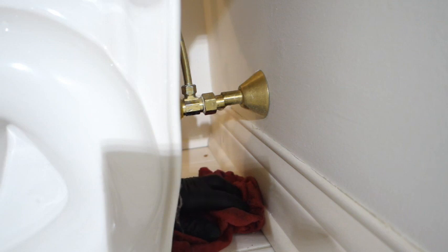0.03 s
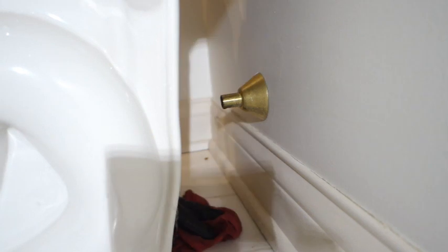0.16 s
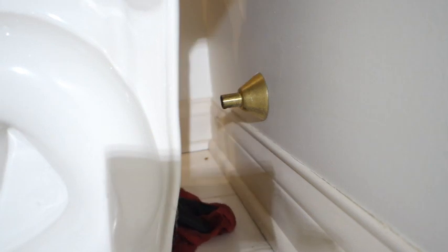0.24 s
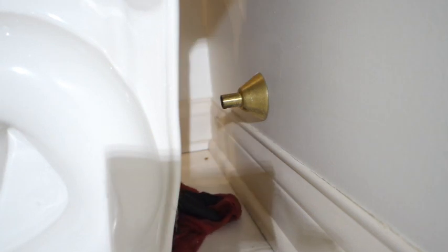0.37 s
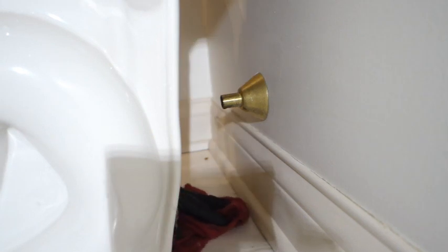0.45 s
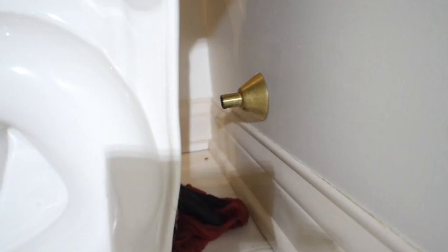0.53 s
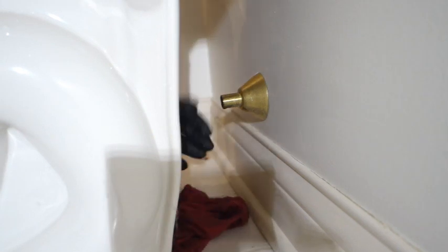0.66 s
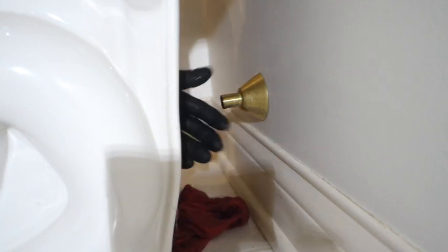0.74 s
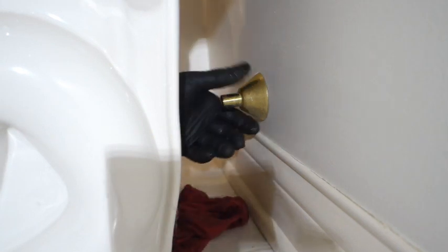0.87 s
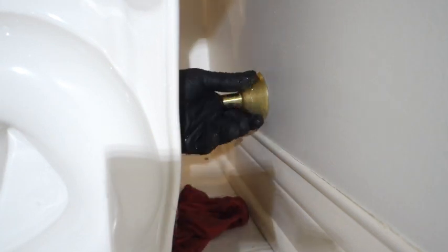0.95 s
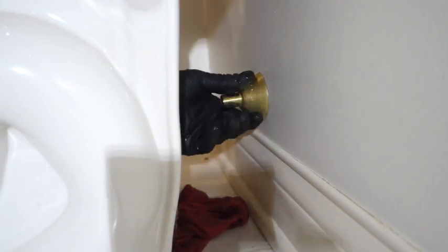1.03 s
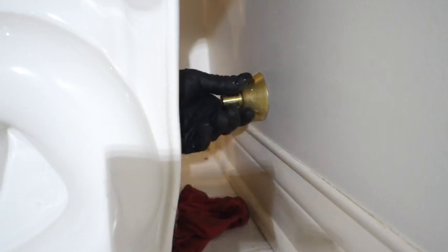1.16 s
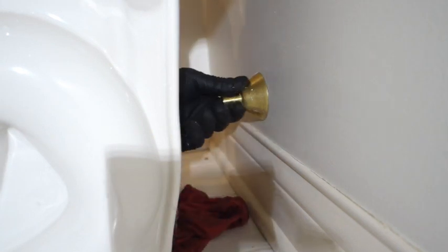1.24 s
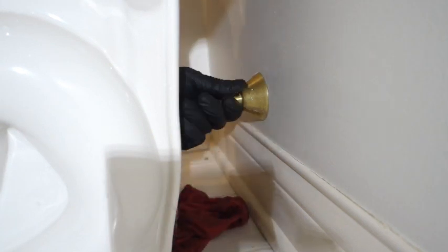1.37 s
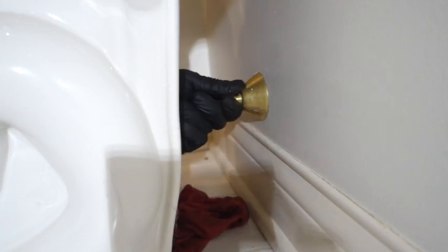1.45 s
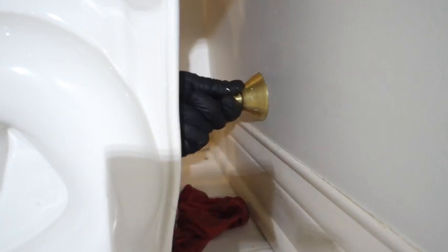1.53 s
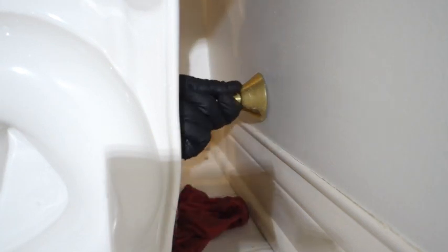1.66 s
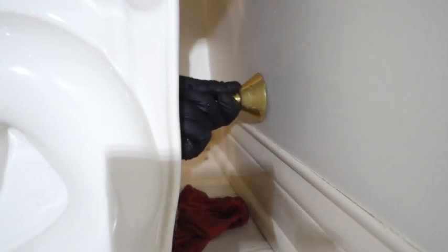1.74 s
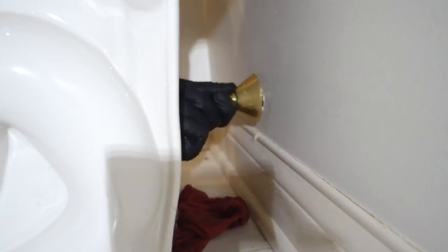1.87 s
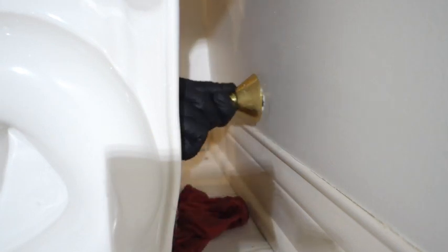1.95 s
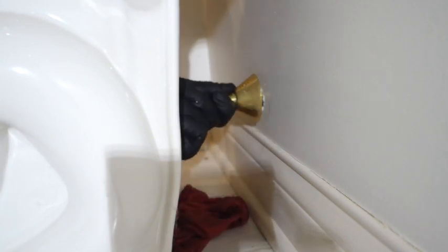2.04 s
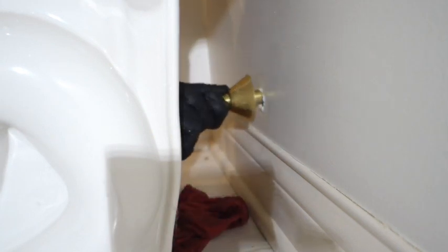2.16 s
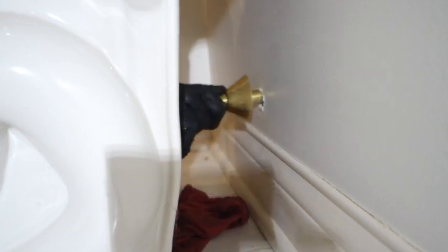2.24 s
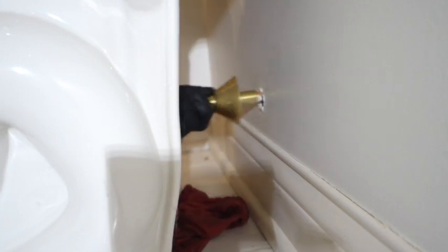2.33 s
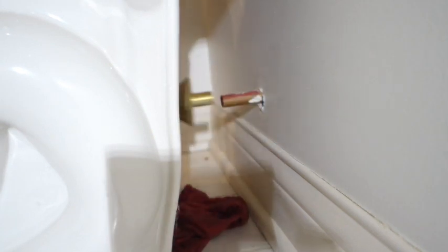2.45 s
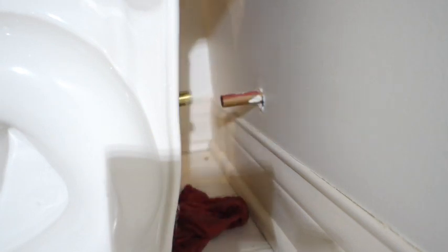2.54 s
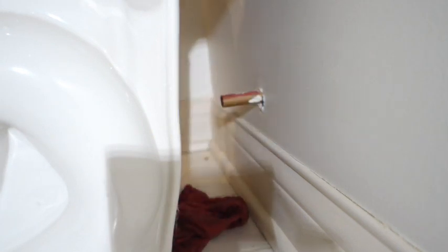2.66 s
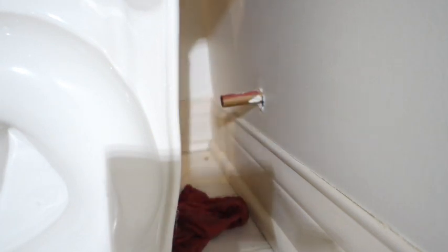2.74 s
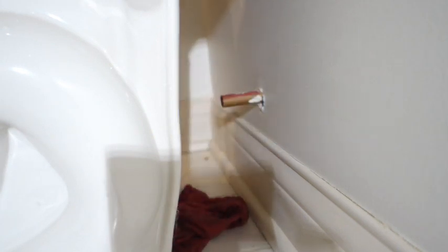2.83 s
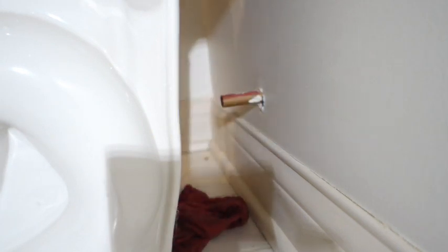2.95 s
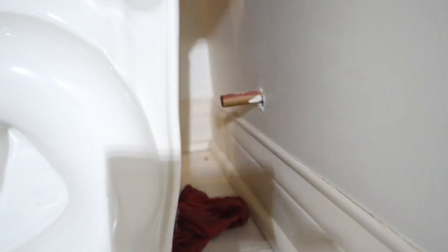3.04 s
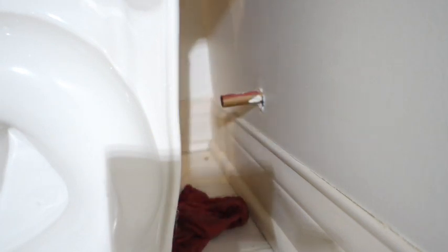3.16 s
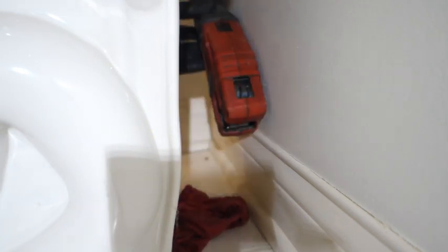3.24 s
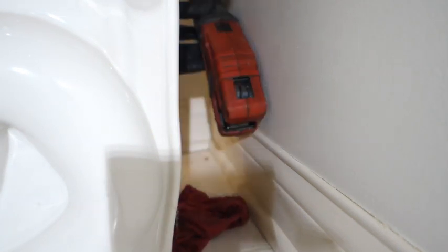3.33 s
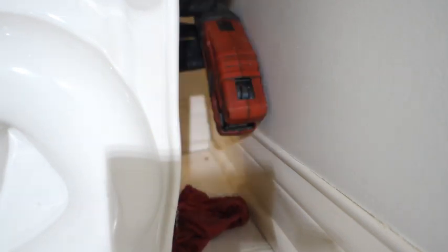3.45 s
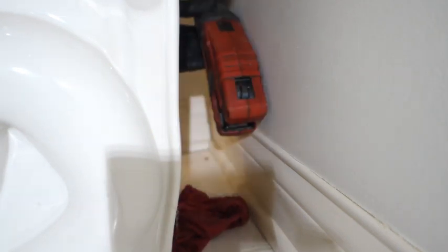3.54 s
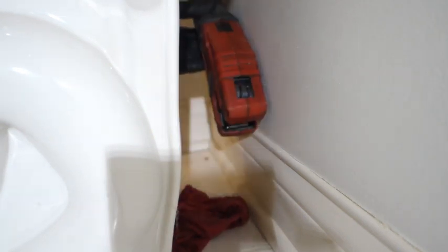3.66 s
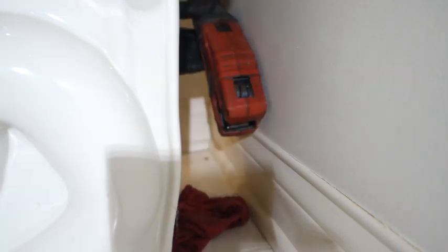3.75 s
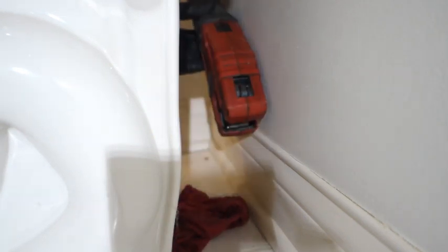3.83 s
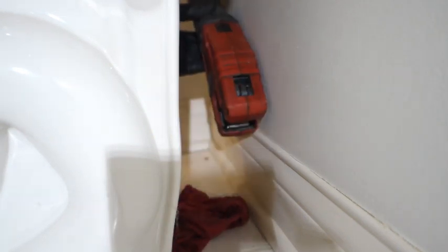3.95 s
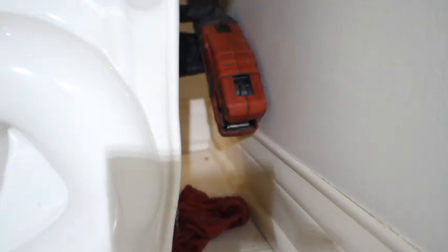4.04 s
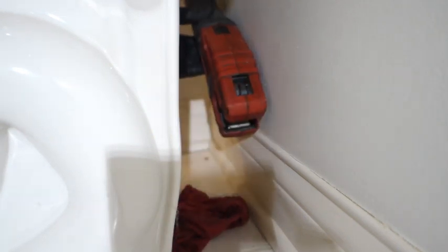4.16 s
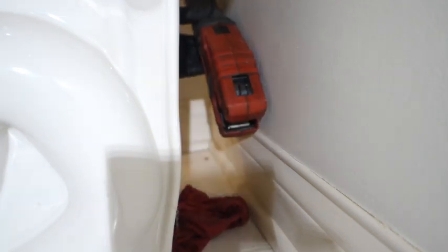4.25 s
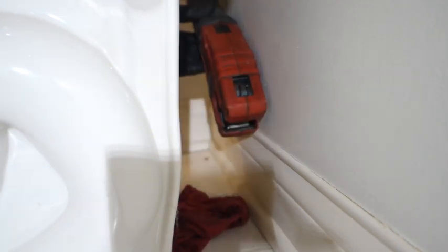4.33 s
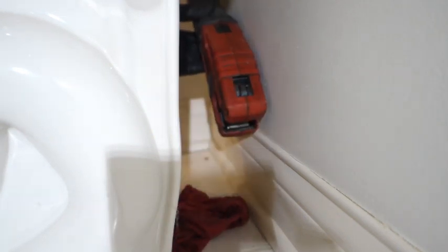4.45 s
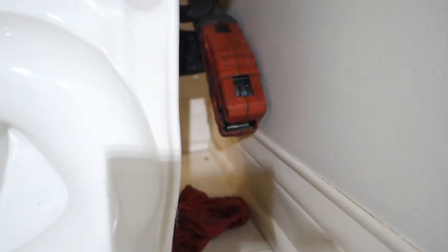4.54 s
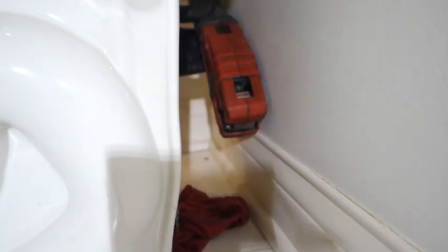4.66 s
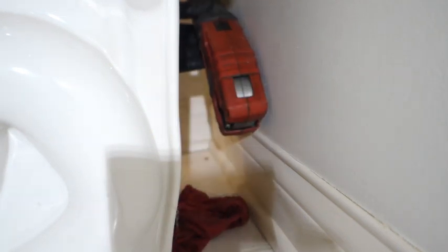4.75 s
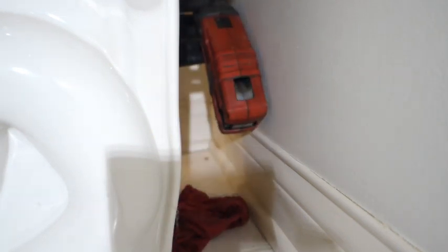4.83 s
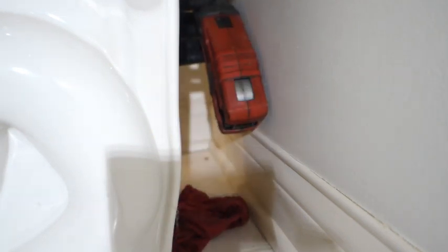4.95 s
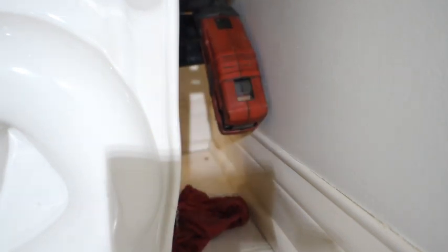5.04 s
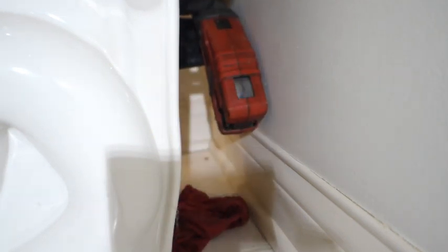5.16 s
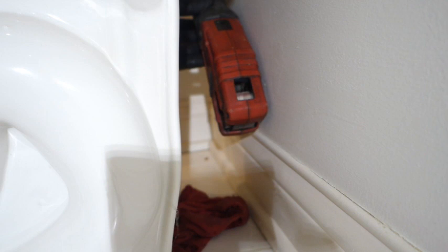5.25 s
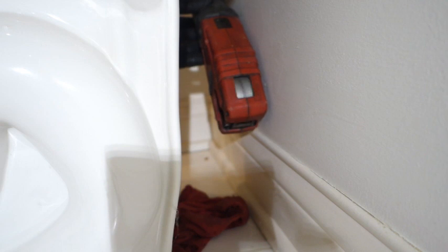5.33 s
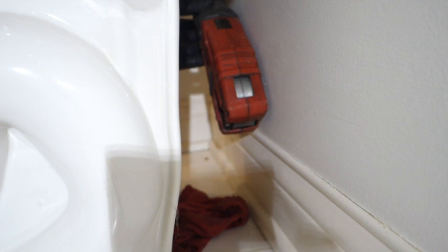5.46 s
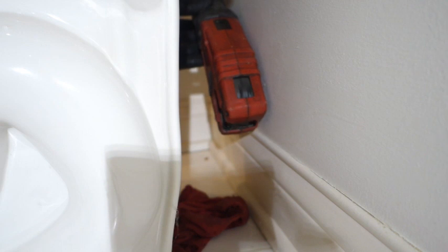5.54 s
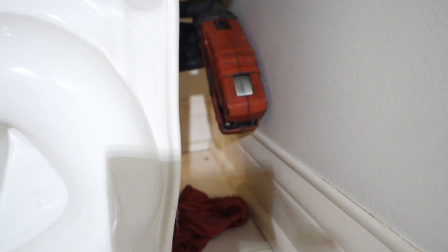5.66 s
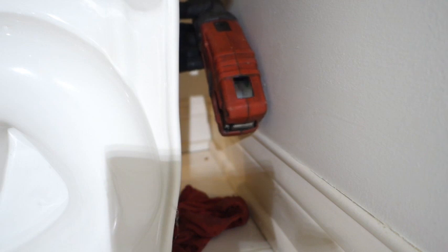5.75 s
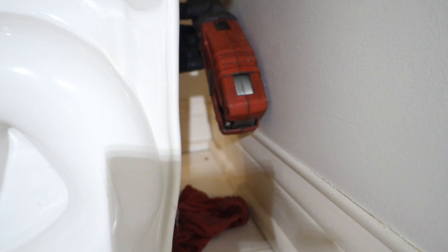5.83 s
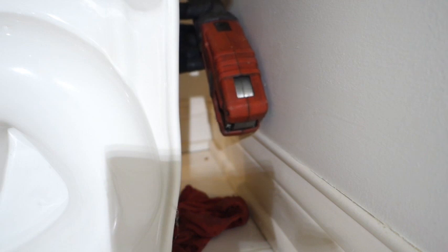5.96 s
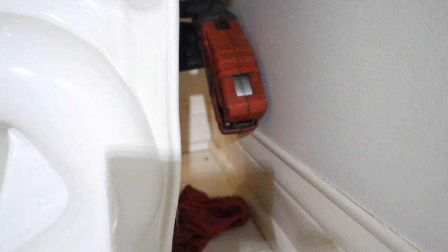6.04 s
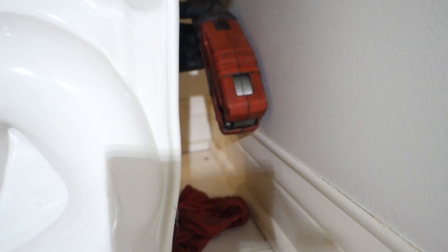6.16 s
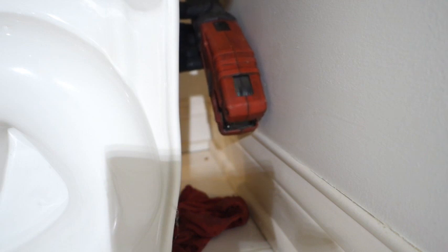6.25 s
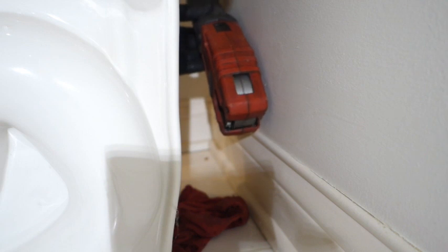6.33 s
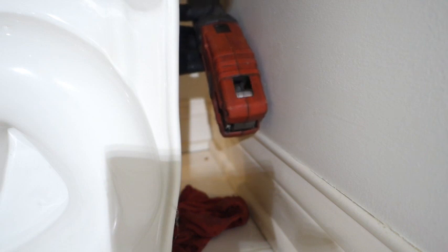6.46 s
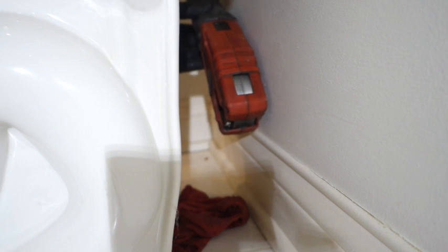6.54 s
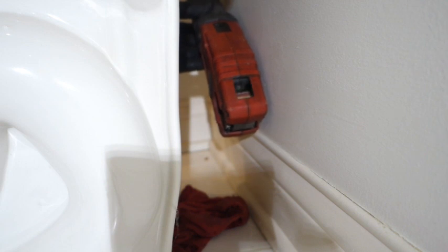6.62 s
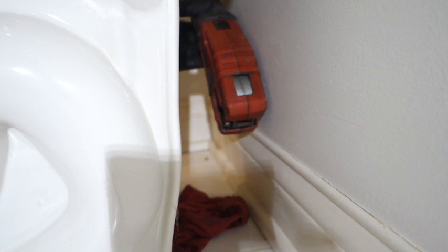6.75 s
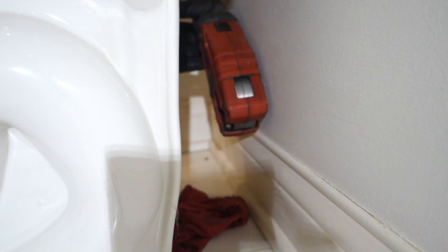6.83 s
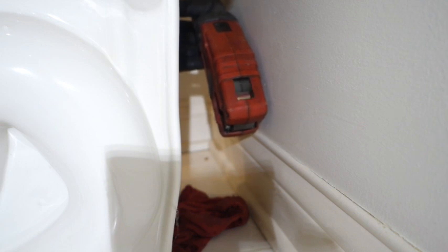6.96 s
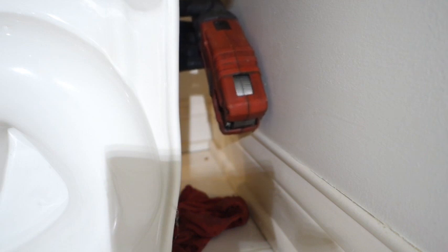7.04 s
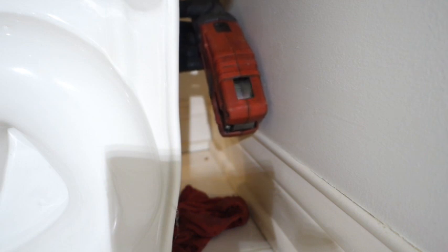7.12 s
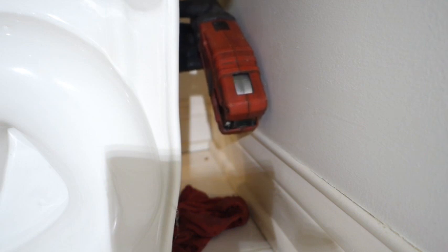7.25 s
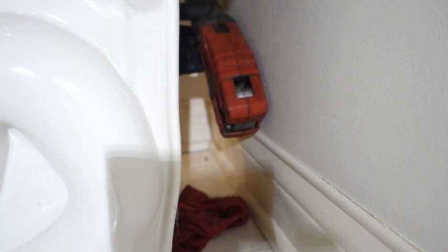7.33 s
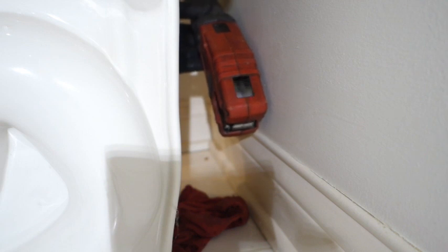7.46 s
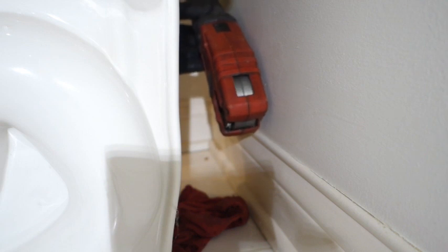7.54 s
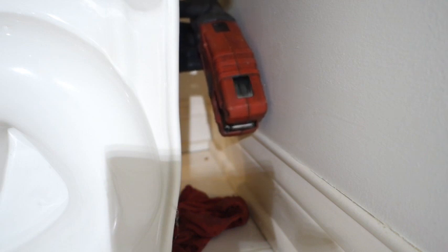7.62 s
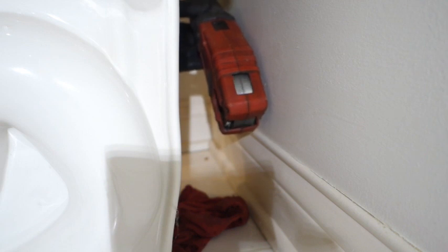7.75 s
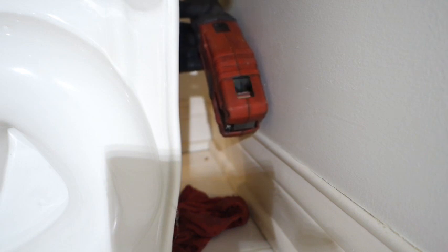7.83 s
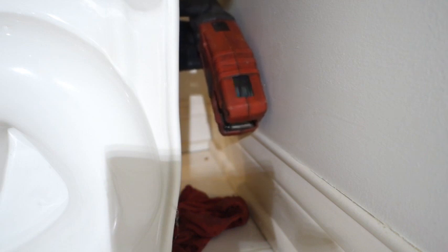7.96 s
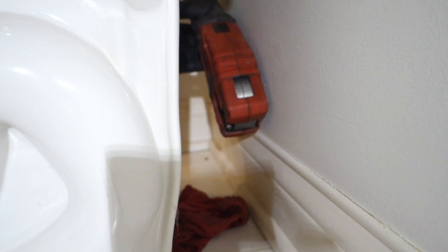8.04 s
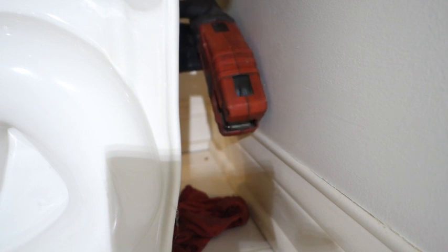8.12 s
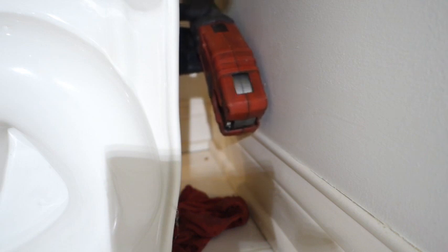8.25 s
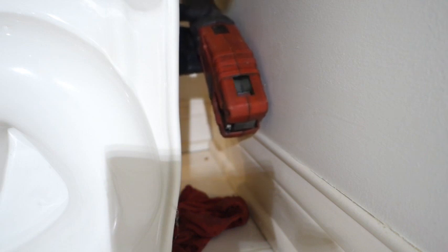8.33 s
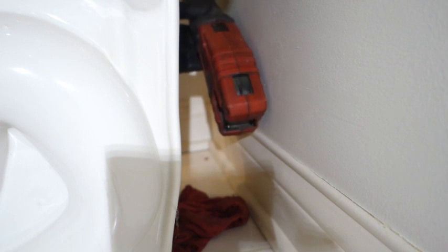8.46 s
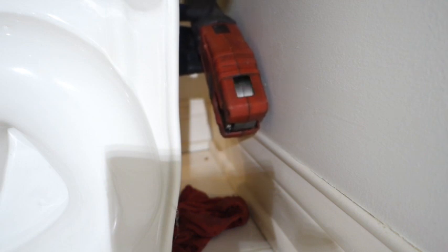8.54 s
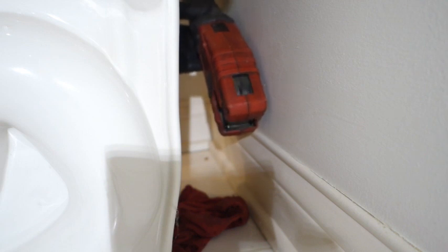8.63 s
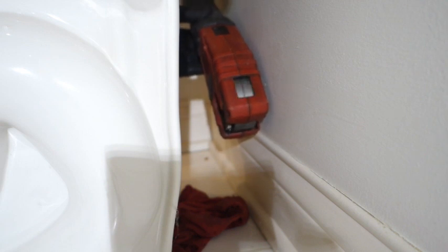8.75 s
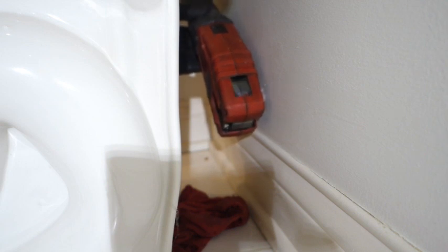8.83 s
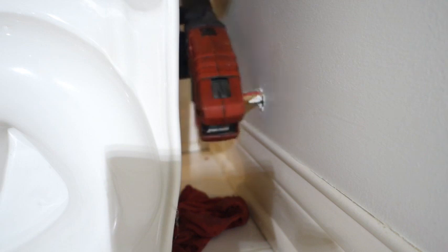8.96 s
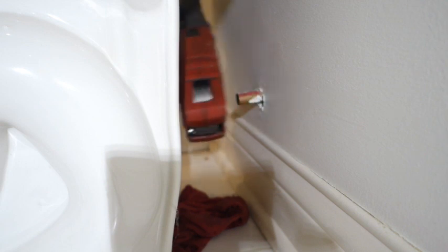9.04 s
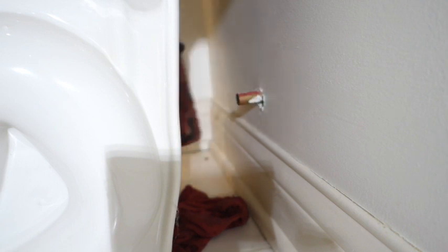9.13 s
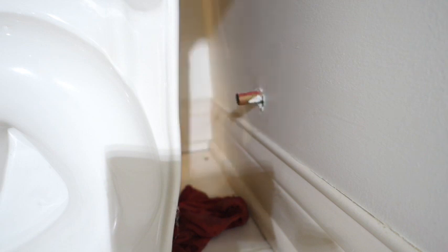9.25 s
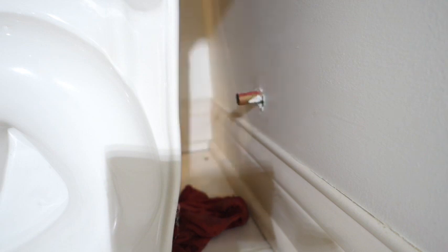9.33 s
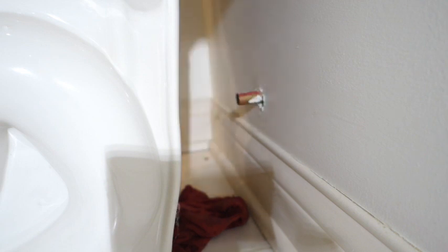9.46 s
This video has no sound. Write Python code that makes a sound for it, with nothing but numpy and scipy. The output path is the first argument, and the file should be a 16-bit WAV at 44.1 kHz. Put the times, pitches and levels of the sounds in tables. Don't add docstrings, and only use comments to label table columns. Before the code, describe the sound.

Dull pipe knocks and a gritty metal scrape in a small bathroom, followed by a motorised pipe cutter's rattling, ticking grind and final latch clack.

```python
import sys
import numpy as np
from scipy import signal
from scipy.fft import rfft, irfft, next_fast_len
from scipy.io import wavfile
from scipy.ndimage import uniform_filter1d

SR = 44100
rng = np.random.default_rng(int(sys.argv[2]) if len(sys.argv) > 2 else 0)


def to_linear_factor(level_db):
    exponent = np.asarray(level_db, float) / 20
    return 10 ** exponent


def master(y):
    cut = np.clip(np.atleast_2d(y).T, -1, 1)
    pcm = np.round(cut * 32767)
    wavfile.write(sys.argv[1], SR, pcm.astype(np.int16))


N = 418509
T, SIZE = np.arange(N) / SR, next_fast_len(N + SR)
HZ = np.maximum(np.arange(SIZE // 2 + 1) * SR / SIZE, 1.0)

# pitch_hz, level_db per hz
HUSH_SPECTRUM = [(12, -48), (20, -34), (59, -2), (129, -1.5), (177, -4), (250, -7), (353, -39), (486, -21),
                 (541, -3), (651, -16.5), (1110, -26), (1300, -22), (1650, -29), (10600, -32.5),
                 (11500, -40), (15000, -91), (22000, -120)]
# pitch_hz, width_hz, level_db
FAN_HUMS = [(120.2, 5.5, -50), (548, 29, -61.5), (730, 50, -68)]
# pitch_hz, level_db
EAR_LEAN = [(60, 3.5), (170, -3), (490, -5), (1420, -3.5), (4070, -13), (11700, -9.5)]
# pitch_hz, level_db
REFLECTED = [(60, -11), (140, -16.5), (350, -12), (840, -6), (2010, -6.5), (4850, -2.5), (11700, 2.5)]
# pitch_hz, t60_s
ROOM_DECAY = [(100, 0.12), (1000, 0.27), (10000, 0.1)]

# peak_s, rise_s, thud_db, scrape_db, bump_db
PUSHES = [(.942, 0.0055, -36, -40.5, -62), (1.13, 0.018, -45.5, -59, -60), (1.288, .01, -36, -55, -45),
          (1.308, .006, -36, -41, -34), (1.58, 0.12, -36.5, -45, -36), (1.819, 0.16, -25.5, -37, -30),
          (2.075, 0.022, -18.5, -30, -40), (2.11, 0.061, -24, -27.5, -27), (2.22, 0.071, -23, -26.5, -36),
          (2.31, 0.27, -18.5, -20.5, -19), (2.43, 0.2, -21, -27, -44), (3.226, 0.018, -47.5, -54, -34.5),
          (3.445, 0.033, -49, -66, -39), (3.8, 0.1, -52, -63, -41.5), (4.11, 0.054, -62, -77, -37),
          (4.56, 0.12, -57, -51, -59)]
# peak_s, rise_s, hold_s, level_db
GLOVE_RUBS = [(0, .01, 0.32, -58.5), (.28, .1, 0.34, -62.5), (.69, 0.064, 0.012, -56), (.75, .1, 0.46, -67),
              (1.03, 0.089, 0.011, -58), (1.13, 0.022, 0.085, -55.5), (1.31, .01, .15, -69),
              (1.485, .02, .01, -59), (1.56, .02, 0.048, -57), (1.78, 0.21, 0.05, -51.5),
              (2.08, 0.051, 0.21, -50.5), (2.29, 0.11, 0.022, -36.5), (2.41, 0.18, 0.011, -38.5),
              (2.6, .1, 0.49, -73), (3.225, .02, 0.069, -66), (3.43, .01, 0.018, -73),
              (4.52, 0.058, 0.067, -62.5)]
# start_s, peak_db, pitch_hz
GLOVE_CREAKS = [(0.6075, -41, 4160), (0.6994, -46, 3770), (1.1258, -42, 2150), (1.48, -36, 2730),
                (1.92, -32, 2330), (2.0408, -37, 2080), (2.041, -43, 3800), (1.9202, -45, 3900),
                (3.2156, -44, 3060), (3.4276, -42, 1860), (3.6845, -50, 4610), (3.7813, -48, 1780),
                (3.8594, -51, 1880), (4.0851, -51, 2890), (3.2158, -55, 7000), (3.4278, -47, 4700),
                (3.4279, -51, 7300), (4.562, -52, 6500)]
# pitch_hz, level_db per hz
FLOOR_SPECTRUM = [(15, -60), (30, -17), (60, -9), (110, -5), (150, -1.5), (185, -5.5), (300, -55)]
# pitch_hz, level_db per hz
THUD_SPECTRUM = [(100, -41), (170, -28), (205, 1), (275, -2.5), (392, -7), (427, -1.5), (553, -10),
                 (800, -40), (1040, -44), (1760, -120)]
# pitch_hz, width_hz, lift_db
WALL_PANEL = [(192.3, 31, 5.5), (227.2, 20, 6), (245, 22, 0), (355.5, 19, 5)]
# pitch_hz, level_db per hz
SCRAPE_SPECTRUM = [(320, -26.5), (550, 6.5), (966, -1), (1290, 0.5), (1640, -4.5), (1730, -5), (1990, -3),
                   (2480, -8.5), (3270, -14.5), (3860, -17), (5000, -46), (6500, -61), (11000, -120)]
# pitch_hz, width_hz, lift_db
BRASS_SLEEVE = [(1270, 55, 7), (2190, 120, 4), (2434, 150, 16.5), (3050, 200, 8), (3820, 230, 16.5),
                (4250, 210, 9), (1690, 80, 7)]
# pitch_hz, level_db per hz
RUSTLE_SPECTRUM = [(2470, -3.5), (4200, -3.5), (5810, -8), (7450, -7), (10600, -13), (11300, -15),
                   (11500, -50), (15000, -68), (22000, -120)]
# start_s, length_s, pitch_hz, level_db
SQUEALS = [
    (0.001, .116, 7100, -62),
    (4.59, 0.016, 7700, -37),
    (4.61, 0.12, 2560, -24.5),
    (8.874, 0.095, 420, -20),
]
# start_s, peak_db, brightness_db
KNOCKS = [(0.9376, -21.5, -2), (1.3024, -23.5, 0.5), (1.549, -23.5, -14), (1.797, -12.5, -15),
          (1.86, -21, -38), (2.041, -40, -13), (2.115, -3.5, -17), (3.158, -52, -19), (3.2167, -40, -2),
          (3.427, -37, -8), (3.728, -40, -25), (3.771, -40, -22), (3.84, -47, -22)]
# pitch_hz, level_db, t60_s
PIPE_MODES = [(277, 0.5, 0.55), (350, 8, 0.075), (420.6, 1, 0.26), (745, -11, .26), (790, -18.5, 5.0),
              (1075, -11, 0.14), (1190, -15.5, .3), (1416, -9.5, 0.23), (1670, -34, 2.0),
              (1880, -10, 0.088), (2260, -11, 0.12), (3280, -25, 0.73)]
# start_s, peak_db, pitch_hz, t60_s
PANEL_BLOWS = [(.939, -21.5, 303, 0.071), (1.36, -33, 190, .1), (1.801, -28, 256, 0.1),
               (1.829, -14, 242, .08), (1.862, -12.5, 194, 0.053), (1.91, -26, 200, .1),
               (2.118, -10, 242, 0.093), (3.229, -28, 187, .08), (3.304, -35, 170, .08),
               (3.448, -33, 110, .1), (3.484, -33, 110, .08), (3.845, -34, 202, 0.081)]
# start_s, peak_db, pitch_hz
FLOOR_THUMPS = [
    (1.589, -41, 51.5),
    (2.325, -21.5, 88.2),
    (3.441, -41, 62.4),
]
# pitch_hz, level_db, t60_s
FLANGE_MODES = [(1265, 2, .7), (2186, 1, .75), (4310, -9, .3), (5744, -9, .45), (6697, -4, .33),
                (9711, -4, .25)]

# time_s, load_db
WHEEL_LOAD = [(4.58, 1.5), (4.64, -1), (4.8, 3), (5.8, -0.5), (7.6, 0.5), (8.2, -2), (8.75, -2.5),
              (8.86, 0), (9.0, -6), (9.18, -15), (9.3, -25.5), (9.49, -31)]
# time_s, turns done
HEAD_TURNS = [(4.58, -.5), (4.678, 0), (5.2235, 3), (5.7572, 6), (6.457, 10), (7.1481, 14), (7.836, 18),
              (8.513, 22), (9.0118, 25), (9.1909, 26), (9.2975, 26.455), (9.4499, 27), (9.6, 27.4)]
# teeth per turn, depth_db
GEAR_STROKES = [(7, 2.0), (11, 3.0)]
GRIND_BY_TOOTH = [-1, 1.5, 0, .5, 0, -1, 1.5, -.5, .5, -.5, 0]
DRONE_BY_TOOTH = [-6, -1.5, -1, -2, 0.5, -1.5, -.5, 1.5, 1.5, 1, 2.5]
# time_s, extra_rumble_db
TOOL_LURCHES = [
    (4.8, 5.8),
    (6.87, 3),
    (7.85, 2),
    (8.04, 3.27),
    (8.49, 6.2),
    (8.84, 3),
]
# pitch_hz, level_db per hz
RUMBLE_SPECTRUM = [(15, -30), (30, -10), (52, 2.5), (65, -3), (83, 3), (100, 3.5), (150, 6), (180, -2),
                   (300, -55)]
# pitch_hz, level_db per hz
DRONE_SPECTRUM = [(97, -25), (165, -6.5), (226, -1), (276, -8), (308, -10), (351, -5), (387, -7.5),
                  (602, -18.5), (700, -28.5), (910, -27), (1540, -120)]
# pitch_hz, level_db per hz
GRIND_SPECTRUM = [(290, -21.5), (500, -4), (637, -18.5), (826, 0), (967, -9), (1550, -1.5), (1960, -6.5),
                  (2970, -8.5), (3260, -12.5), (4600, -19.5), (5980, -26.5), (10100, -120)]
# pitch_hz, level_db per hz
HISS_SPECTRUM = [(2060, -48), (3500, 6.5), (4930, 8.5), (5790, -2.5), (7380, 1), (8660, -4.5), (10600, -3),
                 (11300, -12), (11500, -55), (15000, -64), (22000, -120)]
# pitch_hz, width_hz, lift_db
HOUSING = [(810, 310, 3), (1075, 60, 7), (1400, 61, 3.5), (1543, 31, 2.5), (1780, 37, 5), (2126, 81, 2),
           (2970, 60, 3.5), (2420, 83, 2.5), (2540, 14, 9), (3060, 41, 8.5), (4900, 90, -0.5)]
CONTACT_PLACES = [0, .272, .455, .6, .727]
# peak_db, ring_hz, thin_ring_db, change once the head runs free_db
CONTACTS = [
    (-11.5, 5300, 3, 2),
    (-25.5, 4250, 10, 4.5),
    (-10.5, 3700, 5, 0),
    (-15.5, 3770, 9, -2),
    (-20.5, 3650, 9, -16),
]
# start_s, peak_db, ring_hz
CLACKS = [(4.5873, -29, 4450), (4.5973, -16, 3960), (4.678, -29, 4980), (4.7529, -13.5, 3600),
          (4.857, -16, 4770), (4.9081, -20, 4310), (4.9425, -19, 3680), (5.0423, -17, 4820),
          (5.0917, -18, 4510), (5.2234, -14, 4860), (5.2713, -21, 4030), (5.303, -17, 3480),
          (5.402, -17, 4000), (5.4813, -17, 3590), (5.529, -18, 3790), (5.5813, -15, 4840),
          (5.6603, -15, 3550), (5.7565, -18, 4850), (5.8846, -17, 3990), (5.9323, -16, 4810),
          (5.9792, -21, 4930), (6.0115, -17, 3620), (6.106, -17, 4640), (6.283, -16, 4850),
          (6.3608, -17, 3950), (6.4067, -11, 3940), (6.504, -20, 4900), (6.5354, -15, 3680),
          (6.6766, -20, 4440), (6.715, -15, 4030), (6.8038, -18, 4820), (6.8497, -16, 5000),
          (6.8826, -12, 3600), (6.9774, -18, 4810), (7.099, -26, 3760), (7.151, -17, 4820),
          (7.2286, -12.5, 3950), (7.2727, -26, 3940), (7.4942, -14, 4390), (7.5396, -16, 3570),
          (7.6159, -23, 3780), (7.6656, -16, 4800), (7.712, -24, 3920), (7.8359, -10, 4810),
          (8.006, -20, 4820), (8.1757, -15, 4820), (8.345, -17, 4810), (8.394, -17, 3950),
          (8.466, -17, 3597), (8.5149, -14, 4900), (8.5598, -17, 4300), (8.681, -14, 4440),
          (8.7274, -17, 3560), (8.8476, -13, 4810), (8.8831, -19, 4020), (9.0118, -17, 3770),
          (9.061, -14, 3470), (9.189, -12, 4610), (9.2537, -12, 3630), (9.4507, -15.5, 3430)]
# start_s, peak_db, ring_hz
CATCHES = [(4.6453, -16, 2560), (4.777, -14, 2350), (4.878, -11.5, 2540), (4.966, -25, 1570),
           (4.993, -12, 2890), (5.0639, -15, 2600), (5.1471, -24, 1280), (5.2399, -13, 1600),
           (5.275, -17, 1570), (5.408, -10, 2580), (5.5043, -11, 1510), (5.5948, -15, 1380),
           (5.641, -12, 1570), (5.736, -12, 1610), (5.772, -16, 1800), (5.8046, -25, 1600),
           (5.9488, -12, 2570), (5.9807, -17, 1590), (6.0324, -6.5, 1290), (6.1229, -8.5, 1400),
           (6.2112, -6, 1410), (6.294, -6, 1530), (6.3304, -10, 1390), (6.3624, -16, 1512),
           (6.471, -7.5, 2600), (6.555, -7, 1380), (6.6562, -14, 2840), (6.8674, -14.5, 1570),
           (6.8936, -8, 1383), (6.9904, -5, 2500), (7.0994, -9.5, 1570), (7.156, -7, 1450),
           (7.197, -6.5, 2940), (7.2349, -13, 2080), (7.3152, -17, 2580), (7.351, -23, 1630),
           (7.424, -6.5, 1420), (7.5217, -10, 2950), (7.5926, -9, 1510), (7.7363, -7, 1800),
           (7.7708, -7, 1820), (7.8186, -8, 2380), (7.938, -8, 3040), (8.054, -8, 1400),
           (8.1117, -5.5, 2250), (8.1418, -12, 1560), (8.1937, -7, 2550), (8.34, -9, 1490),
           (8.3958, -7.5, 1830), (8.4474, -10, 1410), (8.509, -15, 2510), (8.561, -10, 1390),
           (8.729, -10, 1440), (8.7584, -17, 1400), (8.8875, -11, 1790), (9.0612, -27, 1820),
           (9.093, -19, 3000), (9.1953, -15.5, 1290), (9.2578, -31, 1520), (9.299, -16, 1430)]
# time_s, pitch_hz, level_db
GEAR_WHINE = [(4.62, 834, -42), (4.86, 831, -34.5), (8.95, 840.6, -35), (9.1, 841, -41), (9.37, 847, -42),
              (9.49, 852, -46)]
# start_s, peak_db
LATCH_KNOCKS = [
    (9.301, -12),
    (9.334, -9.5),
    (9.371, -12.5),
    (9.444, -12),
    (9.455, -4.5),
]

OPENING_S = 0.1
FREED_S, FREED_DB = 2.44, -36
START_S, SPIN_UP_S = 4.5775, .002
RUN_UP_S, RUN_UP_DB = 0.064, -8.5
LOOSE_S = 9.03
COAST_S, COAST_HZ, COAST_DB = 9.09, 135.5, -32


def rms_one(x):
    return x / np.sqrt(np.mean(x ** 2) + 1e-20)


def in_time(table):
    s, *columns = np.transpose(table)
    return [np.interp(T, s, column) for column in columns]


def at_hz(points, hz=HZ):
    hz_points, levels = np.array(points).T
    return np.interp(np.log(hz), np.log(hz_points), levels)


def drift(rate_hz):
    r = np.exp(-80 * np.pi * rate_hz / SR)
    slow = signal.lfilter([1], [1, -2 * r, r * r], rng.standard_normal(N // 40 + 2002))[2000:]
    return np.interp(np.arange(N) / 40, np.arange(len(slow)), rms_one(slow))


def colour(x, spectrum, peaks=()):
    gain = to_linear_factor(at_hz(spectrum))
    for hz, width, db in peaks:
        gain = gain * (1 + (to_linear_factor(db) - 1) / (1 + (2 * (HZ - hz) / width) ** 2))
    return rms_one(irfft(rfft(x, SIZE) * gain, SIZE)[..., :N])


def filtered(x, kind, hz):
    return signal.sosfilt(signal.butter(2, hz, kind, fs=SR, output="sos"), x)


def ring(force, hz, t60):
    r, w = to_linear_factor(-60 / (t60 * SR)), 2 * np.pi * hz / SR
    return signal.lfilter([0, np.sin(w)], [1, -2 * r * np.cos(w), r * r], force + 1e-18)


def clicks(times, db):
    out = np.zeros(N)
    out[(np.asarray(times) * SR).astype(int)] = to_linear_factor(db)
    return out


def patchy(x, edges_hz, patch_db):
    out = 0
    for hz in edges_hz:
        low = filtered(x, "low", hz)
        out = out + to_linear_factor(patch_db * drift(31)) * low
        x = x - low
    return out + to_linear_factor(patch_db * drift(25.0)) * x


def flecks(per_s, low_hz, high_hz, cycles):
    sizes = to_linear_factor(4.1 * np.minimum(rng.exponential(1, N), 4)) * rng.choice([-1, 1], N)
    slips = sizes * (rng.random(N) < per_s * to_linear_factor(5.0 * drift(25)) / SR)
    dealt = rng.integers(0, 16, N)
    pitches = np.geomspace(low_hz, high_hz, 16)
    return rms_one(sum(ring(slips * (dealt == k), hz, cycles / hz) for k, hz in enumerate(pitches)))


def swells(rows, fall_db_per_s, rest_db):
    power = to_linear_factor(2 * rest_db)
    for s, rise, hold, db in rows:
        before_db = 26 * np.maximum(s - T, 0) / rise
        after_db = fall_db_per_s * np.maximum(T - s - hold, 0)
        power = power + to_linear_factor(2 * (db - before_db - after_db))
    return np.sqrt(power)


def wash():
    t, out = np.arange(SR // 2) / SR, 0
    for centre_hz in 60 * 2. ** np.arange(8):
        edges = [centre_hz / 2 ** .5, centre_hz * 2 ** .5]
        band = signal.butter(1, edges, "band", fs=SR, output="sos")
        dying = signal.sosfilt(band, rng.standard_normal((2, len(t))))
        dying = dying * to_linear_factor(-60 * t / at_hz(ROOM_DECAY, centre_hz)) * (t > .002)
        energy = np.sum(dying ** 2, axis=1, keepdims=True)
        out = out + dying / np.sqrt(energy / centre_hz * SR / 2 ** .5)
    return rfft(out, SIZE)


def bathroom(x, echoes, lean, tail_db, wide_db):
    source = rfft(x, SIZE)
    mid = source[0] * (1 + to_linear_factor(tail_db) * echoes[0])
    side = source[-1] * to_linear_factor(at_hz(REFLECTED) + wide_db) * echoes[1]
    tilt = to_linear_factor(lean * at_hz(EAR_LEAN) / 2)
    return irfft([(mid + side) * tilt, (mid - side) / tilt], SIZE)[:, :N]


def room_tone():
    hush = rfft(rng.standard_normal((3, SIZE))) * to_linear_factor(at_hz(HUSH_SPECTRUM))
    high = np.clip(np.log2(HZ / 300) / 4, 0, 1)
    apart = irfft(hush[1:] * np.sqrt(high) + hush[0] * np.sqrt(1 - high), SIZE)[:, :N]
    out = to_linear_factor(-55.5) * rms_one(apart)
    for hz, width, db in FAN_HUMS:
        hum = ring(rng.standard_normal(N), hz, 3.9 / width)
        steadied = hum / uniform_filter1d(hum ** 2, size=2000) ** .25
        out = out + to_linear_factor(db) * rms_one(steadied)
    return out


def push_effort(column, fall_db_per_s, rest_db, opening_db):
    columns = np.transpose(PUSHES)
    s, rise = columns[:2]
    efforts = swells(zip(s, rise, 0 * s, columns[column]), fall_db_per_s, rest_db)
    return efforts + to_linear_factor(opening_db) * (T < OPENING_S)


def floor_bump():
    effort = push_effort(4, fall_db_per_s=62, rest_db=-58, opening_db=-34)
    return effort * to_linear_factor(-5.5) * colour(rng.standard_normal(N), FLOOR_SPECTRUM)


def wall_thud():
    effort = push_effort(2, fall_db_per_s=96, rest_db=-60.5, opening_db=-49)
    return effort * to_linear_factor(1.0 * drift(23)) * colour(rng.standard_normal(N), THUD_SPECTRUM, WALL_PANEL)


def sleeve_scrape(rub):
    effort = push_effort(3, fall_db_per_s=44, rest_db=-84, opening_db=-44.5)
    sliding = (T > 2.061) & (T < FREED_S + .03) | (T > 1.74) & (T < 1.885)
    singing = colour(rub, SCRAPE_SPECTRUM, BRASS_SLEEVE) + to_linear_factor(-3.5) * flecks(1200, 908, 4360, cycles=84)
    scrape = np.where(sliding, singing, colour(rub, SCRAPE_SPECTRUM))
    freed_db = -70 * np.clip(T - FREED_S, 0, .2) * (T < 3.158)
    level = to_linear_factor(-6.5 + 1.6 * drift(90) + freed_db)
    return effort * level * patchy(scrape, [1000, 1900, 3100], patch_db=1.0)


def glove_rustle(rub):
    effort = swells(GLOVE_RUBS, fall_db_per_s=157, rest_db=-94)
    return effort * to_linear_factor(1.5) * patchy(colour(rub, RUSTLE_SPECTRUM), [6500, 8500], patch_db=2.5)


def squeals():
    noise, out = rng.standard_normal(N), 0
    for s, length, hz, db in SQUEALS:
        arch = np.clip(1 - (2 * (T - s) / length - 1) ** 2, 0, 1)
        out = out + to_linear_factor(db) * rms_one(ring(noise, hz, 0.028)) * arch
    return out


def creaks():
    out, t = np.zeros(N), np.arange(2000) / SR
    for s, db, hz in GLOVE_CREAKS:
        noise, start = rng.standard_normal(len(t)), int(s * SR)
        rough = rms_one(ring(noise, hz, 0.005)) + 0.4 * noise
        out[start:start + len(t)] += to_linear_factor(db - 11.0 - 60 * t / 0.064) * rough
    return out


def knocks():
    s, db, bright_db = np.transpose(KNOCKS)
    out = 0
    for hz, level_db, t60 in PIPE_MODES:
        reach = np.clip(np.log2(hz / 500), 0, 1)
        luck_db = rng.normal(0, 3.4, len(s))
        struck_db = db + level_db - 16.0 + luck_db + reach * (bright_db + 4.5)
        out = out + ring(clicks(s, struck_db), hz, 0.85 * min(t60, .25))
    out = filtered(out, "low", 4200)
    blows = clicks(s, db + bright_db) + 1e-18
    crack = to_linear_factor(-5) * signal.lfilter([1], [1, -.98], blows)
    body = to_linear_factor(-12.5) * signal.lfilter([1], [1, -to_linear_factor(-60 / (.22 * SR))], blows)
    return out + (crack + body) * colour(rng.standard_normal(N), SCRAPE_SPECTRUM)


def panel_blows():
    pad = np.hanning(SR // 400) * 800 / SR
    blows = sum(ring(np.convolve(clicks([s], db), pad)[:N], hz, t60) for s, db, hz, t60 in PANEL_BLOWS)
    return filtered(blows, "high", 70)


def floor_thumps():
    soft = np.hanning(SR // 60) * 120 / SR
    return sum(ring(np.convolve(clicks([s], db + 14.0), soft)[:N], hz, 0.42) for s, db, hz in FLOOR_THUMPS)


def hands():
    rub = rng.laplace(size=N)
    pushing = floor_bump() + wall_thud() + sleeve_scrape(rub) + glove_rustle(rub)
    return (T < START_S) * pushing + panel_blows() + floor_thumps()


def flange():
    out = 0
    for hz, db, t60 in FLANGE_MODES:
        for split, drop_db in ((1, 2), (1.006, 9)):
            out = out + ring(clicks([FREED_S], FREED_DB + db - drop_db), hz * split, t60)
    return out * to_linear_factor(2 * drift(30))


def gear_drive():
    (load_db,), (turns,) = in_time(WHEEL_LOAD), in_time(HEAD_TURNS)
    tooth = (turns % 1 * len(GRIND_BY_TOOTH)).astype(int)
    stroke_db = sum(db * (.5 - teeth * turns % 1) for teeth, db in GEAR_STROKES)
    lurch_db = sum(db * np.exp(-((T - s) / 0.062) ** 2) for s, db in TOOL_LURCHES)

    rumble_db = -31.5 + 0.67 * load_db + lurch_db
    rumble = to_linear_factor(rumble_db) * colour(rng.standard_normal((2, N)), RUMBLE_SPECTRUM)

    drone_db = -21 + load_db + uniform_filter1d(np.take(DRONE_BY_TOOTH, tooth), size=300)
    drone = colour(rng.standard_normal((2, N)), DRONE_SPECTRUM, WALL_PANEL)
    drone = to_linear_factor(drone_db + 0.71 * drift(4.2)) * drone

    grind_db = -22 + 0.14 * load_db + np.take(GRIND_BY_TOOTH, tooth)
    grit = rng.laplace(size=N) * to_linear_factor(3.14 * rng.standard_normal(N))
    grind = patchy(colour(grit, GRIND_SPECTRUM, HOUSING), [850, 1490, 2250, 3330], patch_db=1.0)
    grind = to_linear_factor(grind_db + 0.4 * stroke_db) * grind
    chatter = to_linear_factor(grind_db - 7.5) * flecks(900, 652, 4590, cycles=33)

    hiss_db = -32.5 + 0.21 * load_db + 0.88 * (T - START_S) - 3.5 * (turns % 1)
    hiss_db = hiss_db - 4.5 * np.maximum(T - LOOSE_S, 0)
    hiss = colour(rng.standard_normal((2, N)), HISS_SPECTRUM, HOUSING)
    hiss = to_linear_factor(hiss_db + 1.55 * stroke_db) * patchy(hiss, [4270, 5600, 6760, 8000], patch_db=1.5)

    spin_up = np.clip((T - START_S) / SPIN_UP_S, 0, 1)
    run_up = to_linear_factor(RUN_UP_DB * np.clip(1 - (T - START_S) / RUN_UP_S, 0, 1))
    return spin_up * run_up * (rumble + drone + grind + chatter + hiss)


def contacts():
    s, turns = np.transpose(HEAD_TURNS)
    at = (np.arange(28)[:, None] + CONTACT_PLACES).ravel()
    db, hz, thin_db, loose_db = np.tile(CONTACTS, (28, 1)).T
    when, luck = np.interp(at, turns, s), rng.standard_normal((len(at), 3))
    db = db - 0.5 + 2.0 * luck[:, 1] + loose_db * (when > LOOSE_S) + 1 * (at < 1)
    rows = np.c_[when + .0015 * luck[:, 0], db, hz * (1 + .025 * luck[:, 2]), thin_db]
    hard = np.array(CLACKS)
    free = np.abs(when[:, None] - hard[:, 0]).min(axis=1) > .014
    hard_rows = np.c_[hard + [0, 5.5, 0], np.full(len(hard), 2.5)]
    return np.vstack([rows[free & (when < N / SR)], hard_rows])


def ticks():
    out, t = np.zeros((2, N + 2000)), np.arange(2000) / SR
    for s, db, hz, thin_db in contacts():
        noise, start = rng.standard_normal((2, len(t))), int(s * SR)
        snap = filtered(noise, "high", 3300) * (to_linear_factor(-13 - 60 * t / 0.012) + to_linear_factor(-13 - 60 * t / 0.08))
        rung = rms_one(ring(noise, hz, 0.005)) * to_linear_factor(-12.5 - 60 * t / 0.05)
        thin_hz = np.clip(8500 + 1500 * noise[0, -1], 6000, 10900)
        thin = rms_one(ring(noise, thin_hz, 0.002)) * to_linear_factor(thin_db - 20.0 - 60 * t / 0.045)
        out[:, start:start + len(t)] += to_linear_factor(db) * (snap + rung + thin) * np.minimum(t / 0.0005, 1)
    return out[:, :N]


def whine():
    hz, db = in_time(GEAR_WHINE)
    on = (T > GEAR_WHINE[0][0]) & (T < GEAR_WHINE[-1][0])
    phase = 2 * np.pi * np.cumsum(hz + 7 * drift(25) + 7 * drift(3)) / SR
    return on * np.sqrt(2) * to_linear_factor(db + 5.0 * drift(32)) * np.sin(phase)


def catches():
    t, out = np.arange(4000) / SR, np.zeros(N)
    burst = to_linear_factor(-9 - 60 * t / 0.088) * (1 - np.exp(-t / 0.0026))
    grit = filtered(rng.laplace(size=N) * to_linear_factor(2.5 * rng.standard_normal(N)), "high", 1000)
    grit = colour(grit, GRIND_SPECTRUM, HOUSING)
    for s, db, hz in CATCHES:
        at = slice(int(s * SR), int(s * SR) + len(t))
        rung = rms_one(ring(rng.standard_normal(len(t)), hz, 0.016))
        out[at] += to_linear_factor(db) * burst * (grit[at] + to_linear_factor(-0.5) * rung)
    return out


def coast():
    fade = to_linear_factor(COAST_DB - 26 * (T - COAST_S)) * np.clip((T - COAST_S) / 0.031, 0, 1)
    return fade * np.sin(2 * np.pi * COAST_HZ * T)


def latch():
    s, db = np.transpose(LATCH_KNOCKS)
    grit = signal.lfilter([1], [1, -.992], clicks(s, db - 35)) * rng.standard_normal(N)
    rattle = ring(clicks(s, db - 29.0), 780, 0.01) + grit
    return ring(rattle, 884, 0.039) + .5 * ring(rattle, 1360, 0.034) + 0.29 * ring(rattle, 444, 0.046)


def cutter():
    return gear_drive() + ticks() + whine() + squeals() + catches() + coast() + latch()


def scene():
    echoes = wash()
    by_hand = np.atleast_2d(hands() + knocks() + creaks())
    near = bathroom(by_hand, echoes, lean=.25, tail_db=-8, wide_db=-1.5)
    tool = bathroom(cutter(), echoes, lean=0.44, tail_db=-10.0, wide_db=-1.0)
    return near + flange() + tool + room_tone()


def band_limit(x):
    return signal.sosfilt(signal.butter(12, 12270, fs=SR, output="sos"), x)


def record(dry):
    rounded = .8 * np.tanh(dry / .8)
    top_cut = signal.ellip(10, .5, 36, 11150, fs=SR, output="sos")
    mix = signal.sosfilt(top_cut, rounded)
    return band_limit(mix)


dry = scene()
out = record(dry)
master(out)
```